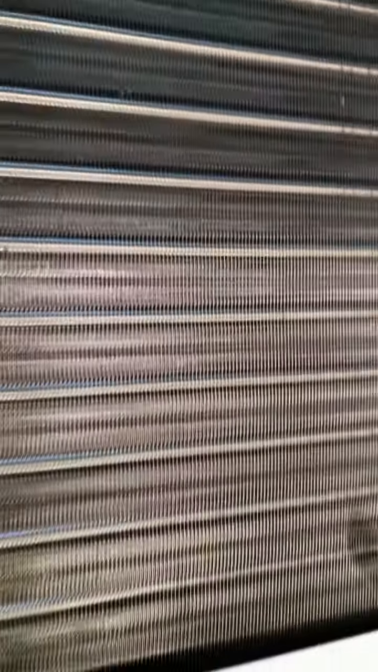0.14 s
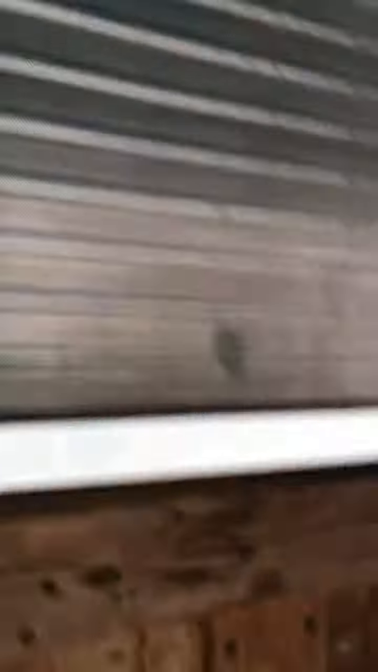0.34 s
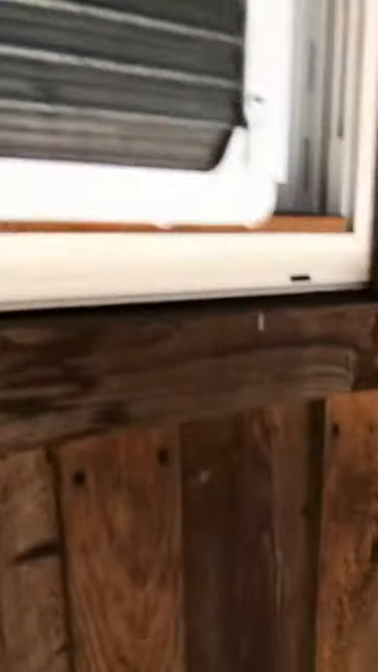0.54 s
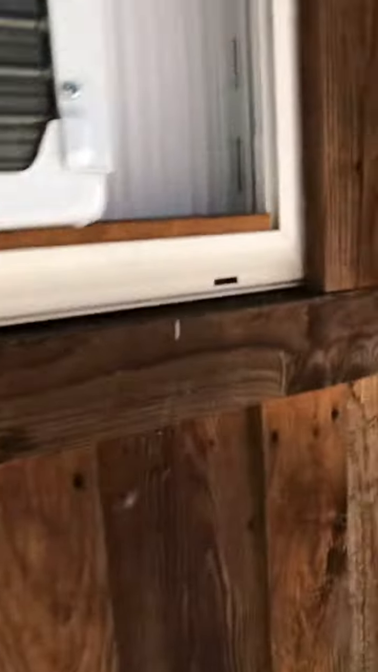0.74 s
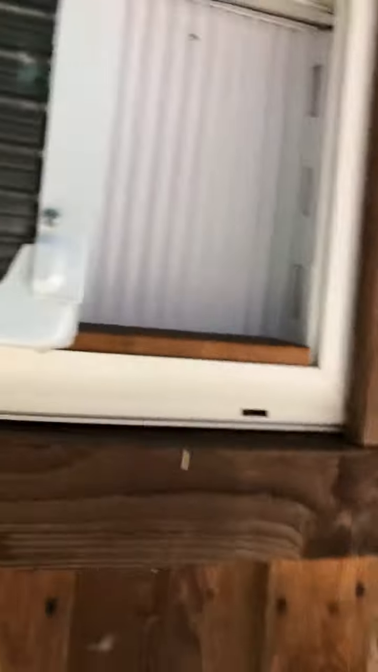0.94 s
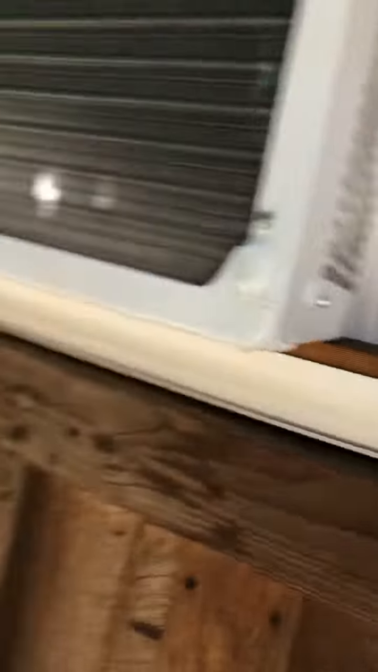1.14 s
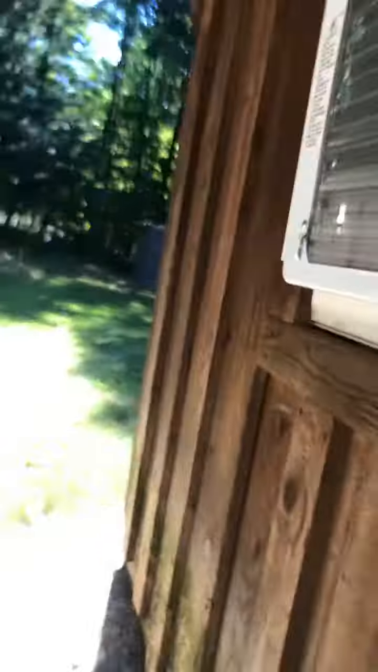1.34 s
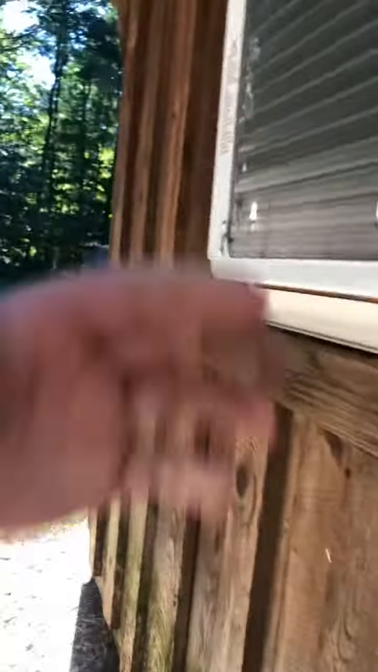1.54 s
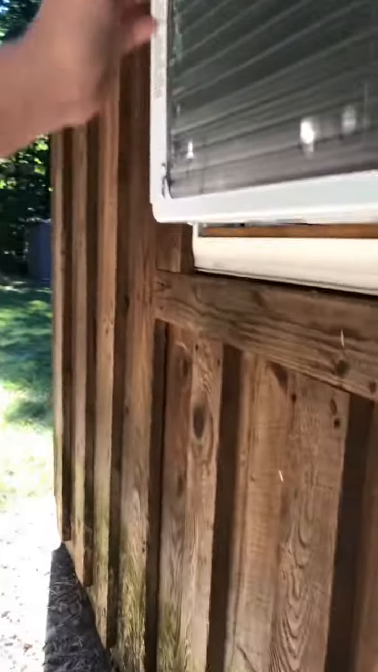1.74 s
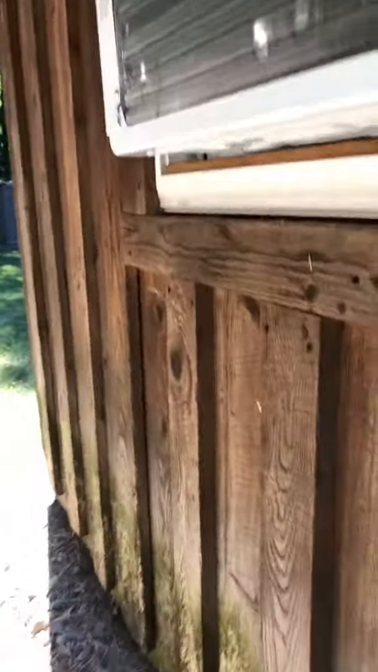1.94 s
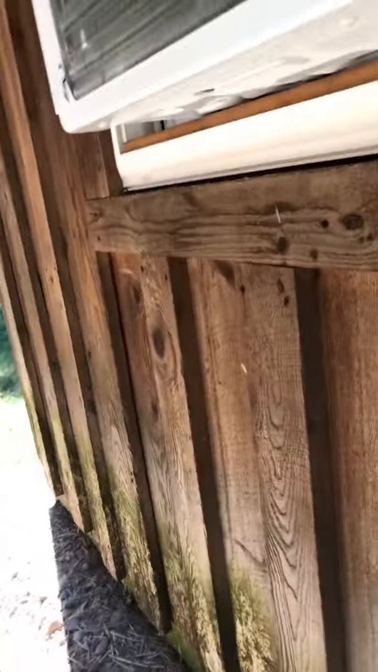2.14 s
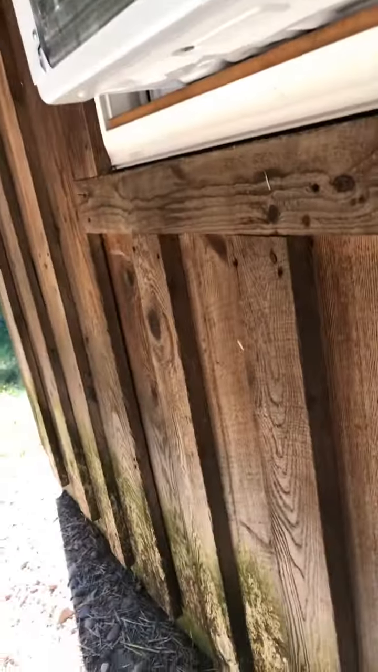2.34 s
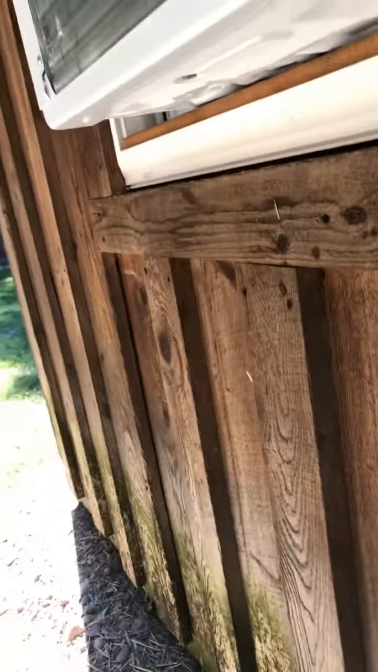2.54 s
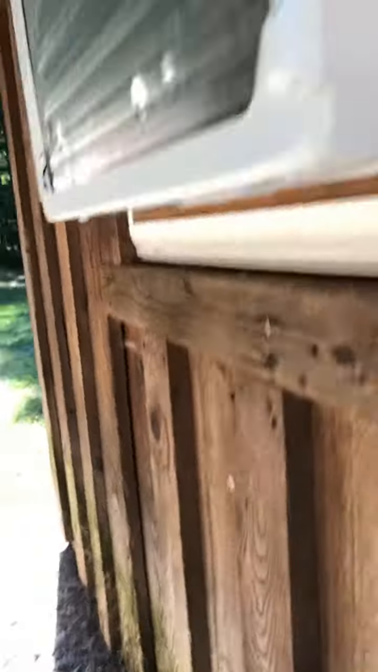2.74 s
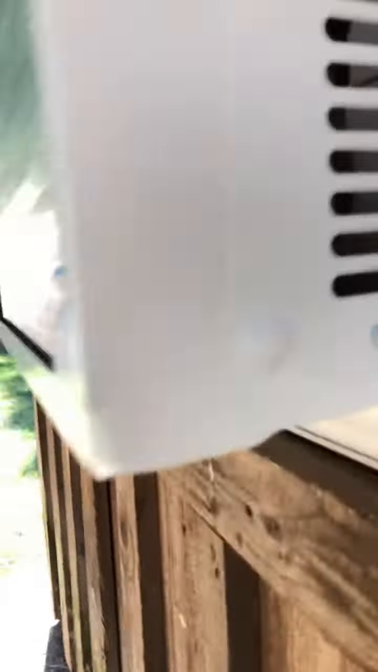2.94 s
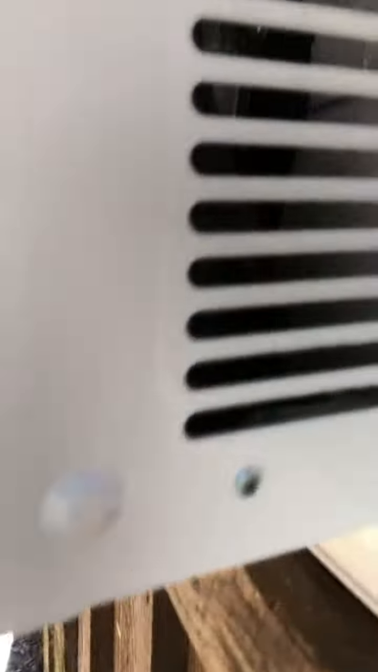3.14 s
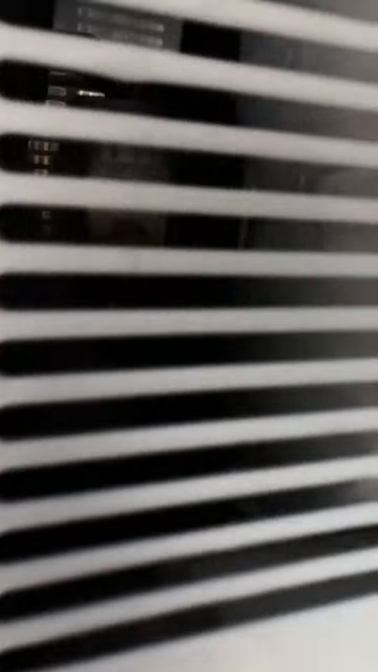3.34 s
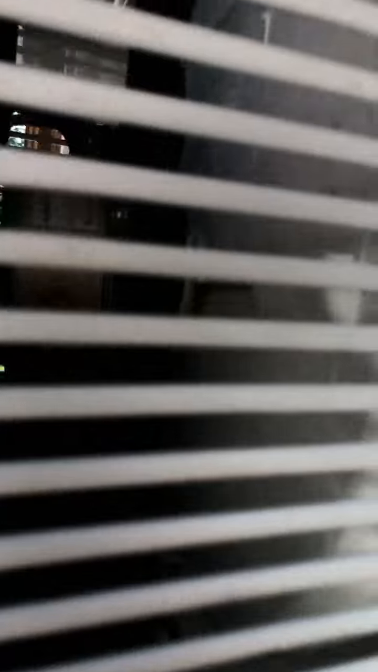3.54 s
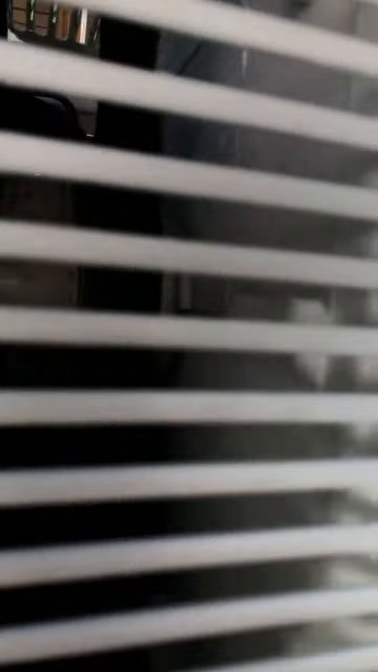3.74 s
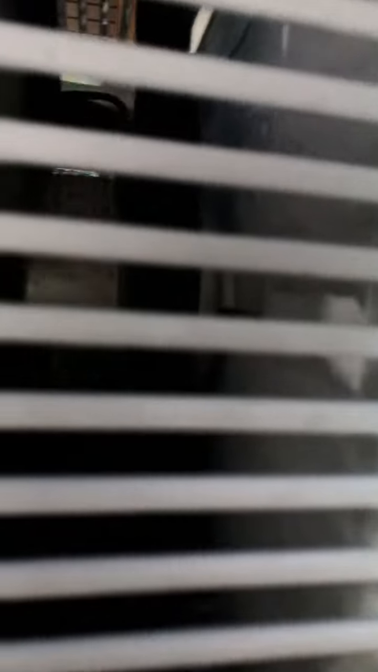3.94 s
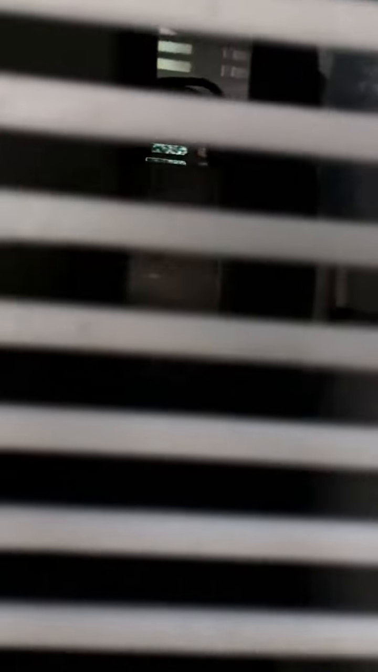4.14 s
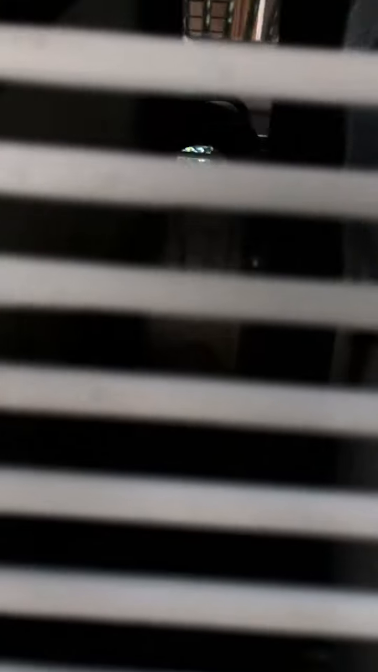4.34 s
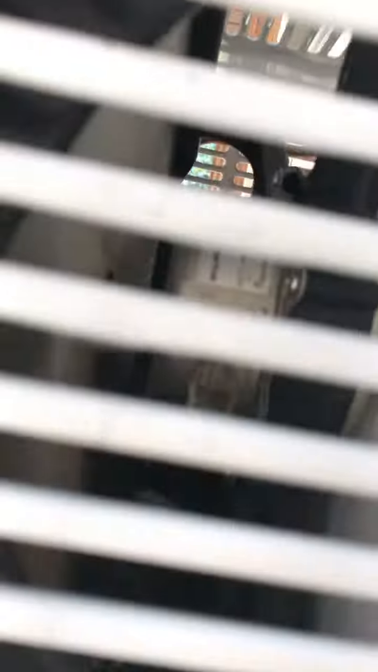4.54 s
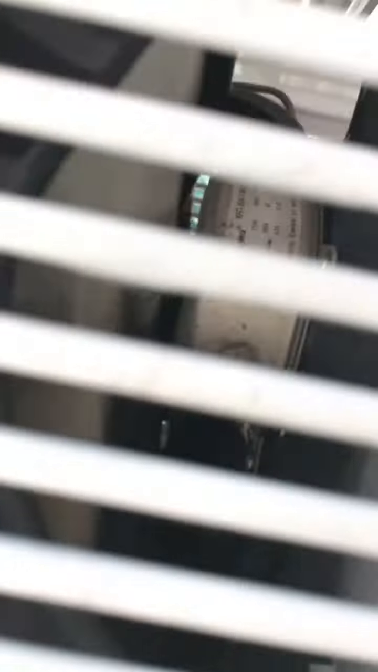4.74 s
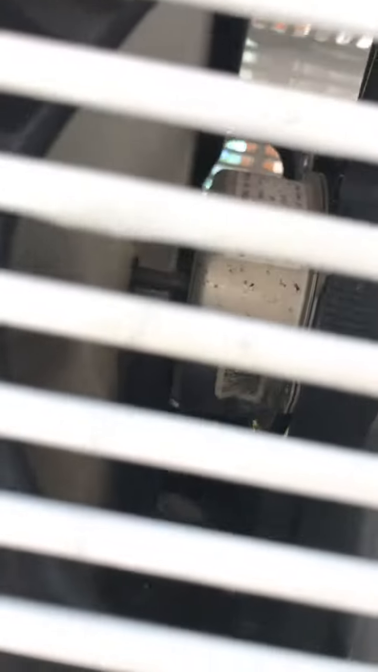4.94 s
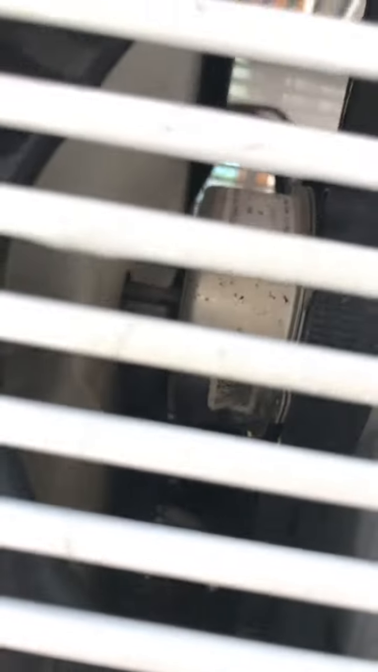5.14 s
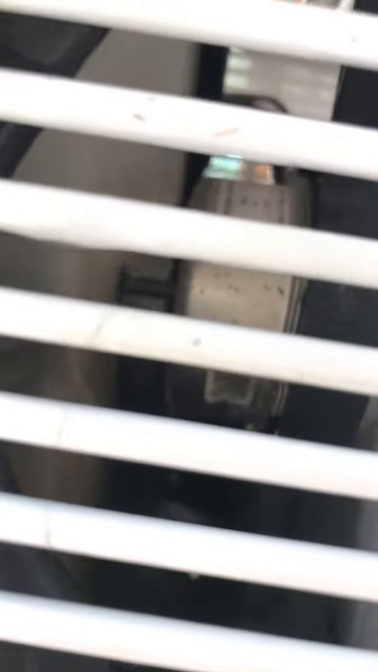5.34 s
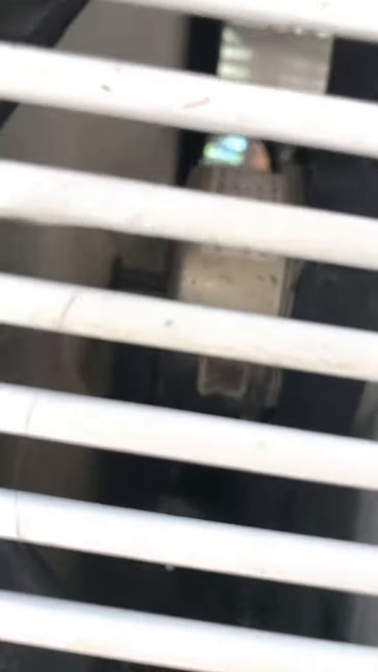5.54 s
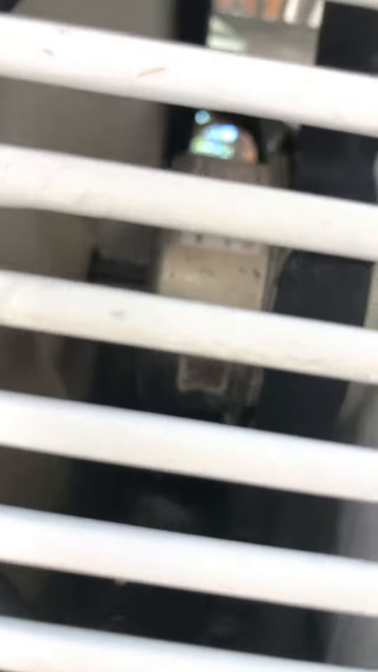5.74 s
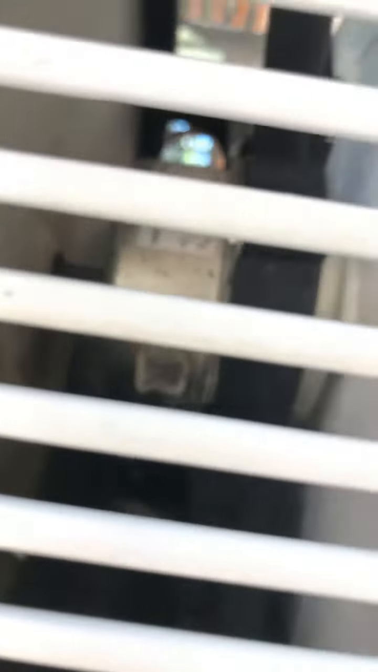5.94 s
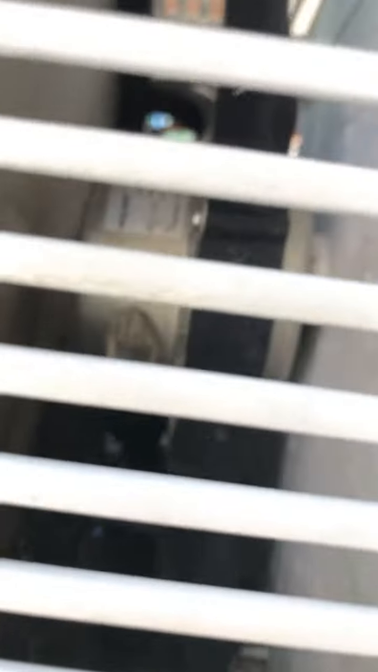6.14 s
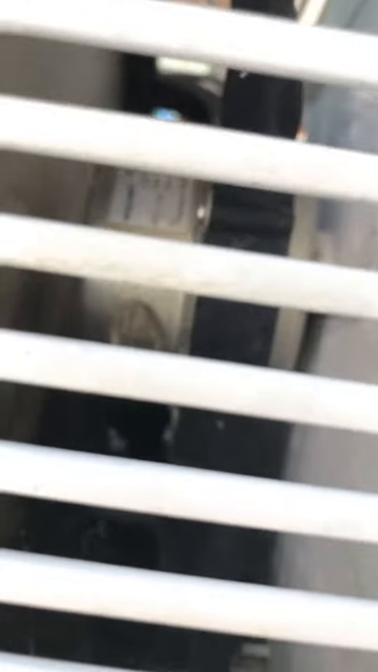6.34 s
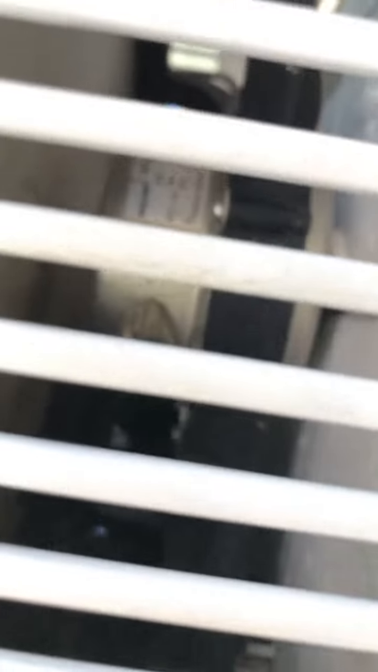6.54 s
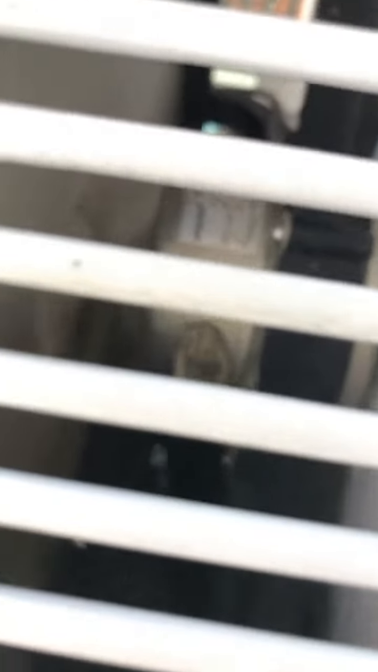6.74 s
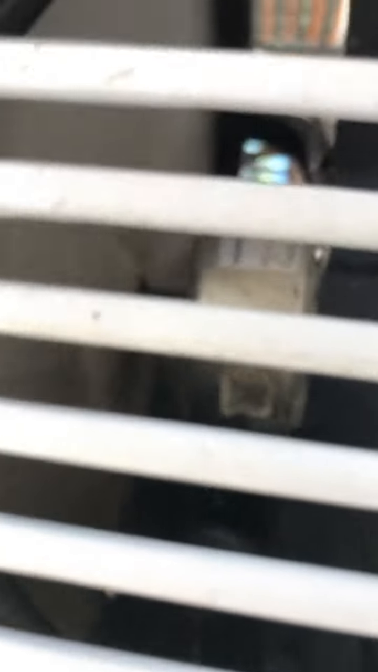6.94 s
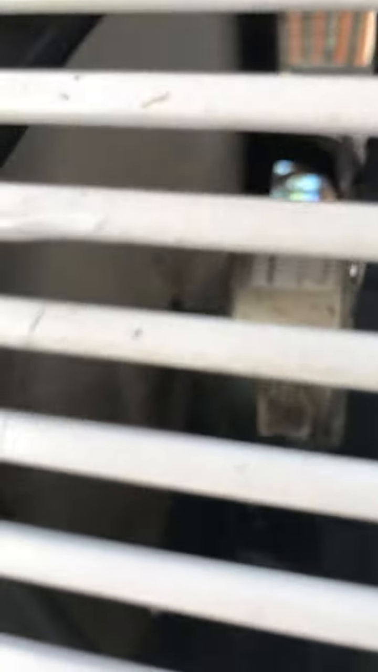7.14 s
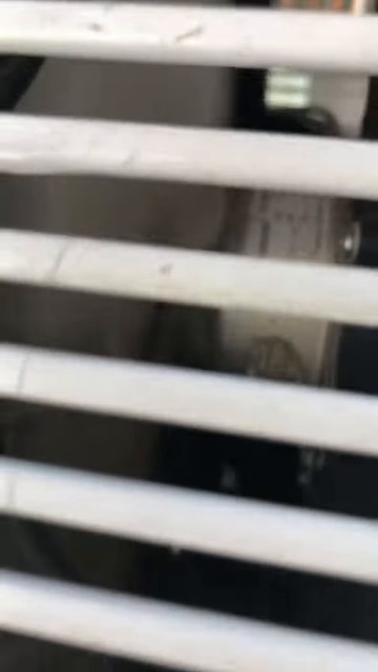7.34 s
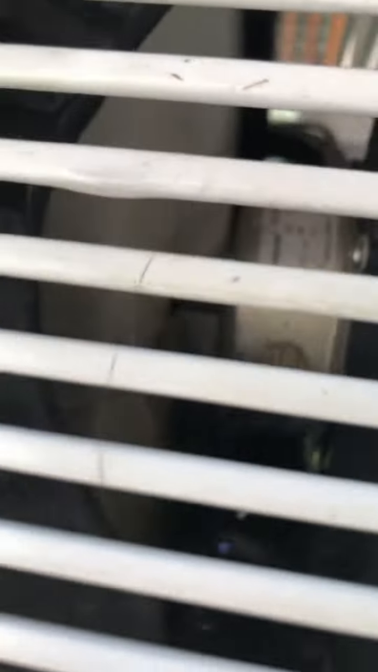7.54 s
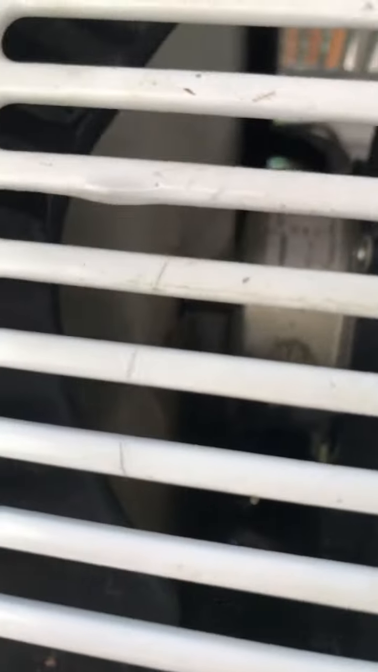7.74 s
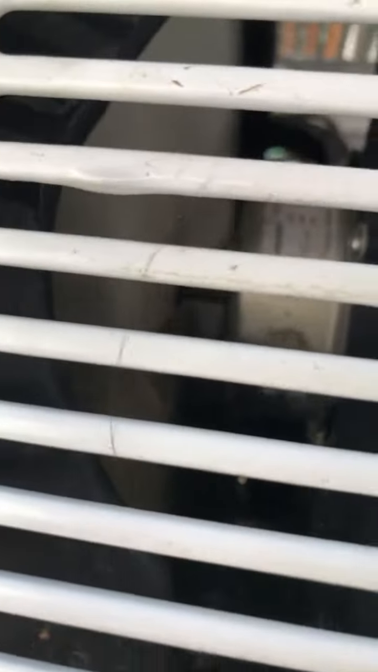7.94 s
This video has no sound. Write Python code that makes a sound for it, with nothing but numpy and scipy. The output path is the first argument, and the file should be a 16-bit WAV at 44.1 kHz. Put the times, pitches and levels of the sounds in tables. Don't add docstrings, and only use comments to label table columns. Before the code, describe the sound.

Outdoors, a phone microphone is carried close around a running window air conditioner. From 0 to 0.4 s the outflow buffets the microphone with quick, lumpy low thumps over fan noise, with one faint far bird chirp. From 0.4 to about 1.2 s the thumps stop and a soft airy band climbs in pitch as the phone slides past the case edge. Until 3 s the rush is quieter and hollow beside the wooden wall; distant chirps come between 1.6 and 2.3 s, and a sharp water slap with a tiny metallic knock lands at 2.2 s. Around 3.2 to 3.6 s the sound swells strongly: low steady blade drone near 112 Hz, motor buzz, full air roar. It stays loud and fluttering to 8 s, with faint compressor whine, fine spray, bright droplet ticks, and a clearer pan knock at 7.6 s.

```python
import sys
import numpy as np
from scipy import signal
from scipy.fft import rfft, irfft, next_fast_len
from scipy.io import wavfile
from scipy.ndimage import uniform_filter1d

SR = 44100
rng = np.random.default_rng(int(sys.argv[2]) if len(sys.argv) > 2 else 0)


def digitize_waveform(pressure):
    field = np.atleast_2d(pressure).T
    bounded = np.clip(field, -1, 1)
    quanta = np.round(bounded * 32767).astype(np.int16)
    wavfile.write(sys.argv[1], SR, quanta)


def attenuation_scalar(level_db):
    decades = np.asarray(level_db, float) / 20
    return 10 ** decades


N = 351477
t = np.arange(N) / SR
BLADE_HZ = 111.95

# (time [s], nearness to case [dB], view of coil fins [dB], draught on microphone [dB])
PHONE_PATH = [(0.0, -10.5, 4, -2), (0.4, -6.5, 3, -5), (0.6, -6, 4, -11), (0.9, -6, 5.5, -15),
              (1.2, -6, 1.5, -10), (1.35, -10, 2.5, -18), (1.8, -10, 1.5, -17), (2.2, -10.5, 3.5, -15.5),
              (2.7, -8.5, 3, -21), (3.0, -9, 2.5, -17), (3.4, -0.5, 2.5, -5), (3.7, 0.5, 4, 2.5),
              (4.2, 3, 1.5, 3.5), (4.7, 2.5, 0.5, 2), (5.4, 2, 0.5, 1.5), (6.8, 2.5, 1, 4.5),
              (7.3, 3.5, 0.5, 5.5), (7.97, 3.5, 0.5, -2.5)]
# (time [s], order 1 [dB], order 2 [dB], order 3 [dB])
BLADE_LEVELS = [(0.0, -41, -40, -40.5), (0.4, -50, -62, -46), (0.6, -44.5, -40.5, -48),
                (0.8, -38.5, -47, -44.5), (1.05, -45.5, -61, -41.5), (1.3, -55, -59, -47.5),
                (2.2, -72, -56, -48), (2.6, -55.5, -62, -62), (2.85, -42, -55, -46.5),
                (3.2, -33.2, -38, -37), (3.6, -27.5, -31, -31.5), (3.85, -28.5, -34, -31.5),
                (4.6, -24.5, -30.5, -30), (5.5, -28.5, -30.5, -31.5), (5.95, -28, -34.5, -31),
                (6.35, -30, -30.5, -32.5), (7.2, -28.5, -32, -31), (7.97, -32.5, -34, -32.5)]
# (time [s], level [dB])
MOTOR_HUM = [(0.0, -49.5), (1.0, -41.5), (1.6, -45.5), (2.8, -44), (3.2, -41), (3.6, -34.5), (4.0, -34),
             (4.4, -31), (4.8, -33), (5.2, -38), (6.0, -32.5), (6.4, -36.5), (6.8, -33), (7.2, -31.5),
             (7.97, -41)]
# (order [-], level [dB])
COMPRESSOR_ORDERS = [(19, -64), (28, -71), (29, -67), (30, -70), (35, -67), (127, -71), (128, -80),
                     (129, -67)]
# (frequency [Hz], density [dB per Hz])
RUSH_SPECTRUM = [(35, -12), (95, 0), (160, -2.5), (350, -4.5), (480, -19), (600, -13), (800, -12.5),
                 (980, -22), (1300, -22.5), (1800, -27), (2600, -30.5), (6600, -36.5), (7400, -37),
                 (8200, -42.5), (12000, -65.5)]
# (frequency [Hz], change [dB])
WALL_COMB = [(60, -1), (100, -0.5), (160, 4), (240, -3), (320, -4), (470, 1), (600, 4), (740, -10),
             (880, 3.5), (1050, -1), (1550, -4), (2000, 1.5), (4500, -2.5)]
PART_HZ = [80, 270, 680, 3200]
# (time [s], level [dB], centre [Hz])
PORT_BUFFET = [(0.0, -45, 362), (0.02, -31, 320), (0.05, -32.5, 289), (0.174, -35, 337),
               (0.194, -29.5, 332), (0.24, -37, 350), (0.312, -29.5, 445), (0.368, -47, 384),
               (0.38, -35, 338)]
# (time [s], peak [dB], pitch [Hz])
PORT_THUMPS = [
    (0.057, -24, 240),
    (.099, -22, 332),
    (.194, -24, 310),
    (0.219, -29, 400),
    (0.269, -26.5, 364),
    (.299, -36, 480),
    (.311, -33, 524),
    (.33, -28, 675),
]
# (time [s], peak [dB], length [s])
WATER_SCOOPS = [(0.042, -47.5, 0.21), (0.252, -46, 0.085), (0.433, -51, 0.085), (1.155, -51.5, 0.097),
                (1.503, -55, 0.054), (1.677, -55, 0.44), (2.087, -49.5, 0.11), (2.225, -48, 0.037),
                (2.375, -59, 0.24), (2.72, -52, 0.11), (3.11, -58, 0.18), (3.46, -60, 0.064),
                (3.598, -46, 0.054), (3.91, -50.5, 0.14), (4.054, -49, .07), (4.22, -53, 0.15),
                (4.553, -47, 0.17), (4.96, -50, 0.33), (5.133, -44, 0.029), (5.226, -48, 0.14),
                (5.53, -45, 0.11), (5.99, -51, 0.083), (6.21, -52.5, 0.25), (6.535, -44, 0.057),
                (6.75, -44.5, 0.1), (6.947, -47.5, .12), (7.14, -48, .1), (7.273, -50, 0.035),
                (7.546, -47, 0.03), (7.64, -48, 0.13)]
# (frequency [Hz], density [dB per Hz])
SPRAY_SPECTRUM = [(1500, -27), (3000, -2), (6000, -1), (9000, 0.5), (13000, 1.5), (16000, 2)]
# (time [s], peak [dB], centre [Hz])
WATER_SLAPS = [(0.6474, -40, 4350), (0.8026, -40, 5000), (1.144, -43, 4360), (1.915, -38, 4700),
               (2.07, -38, 7210), (2.2362, -25.5, 4500), (2.377, -42, 5090), (2.5855, -41, 6140),
               (3.1094, -38, 4440), (3.455, -36, 3810), (3.5728, -36, 3590), (3.7524, -40, 7500),
               (3.896, -36, 6390), (4.1425, -37, 5360), (4.275, -37, 7440), (4.584, -46, 4260),
               (4.863, -40, 3530), (4.9242, -46, 6590), (5.021, -42, 7640), (5.116, -37, 6000),
               (5.21, -32.5, 5390), (5.505, -37, 7600), (5.9828, -40, 7420), (6.0257, -38, 8340),
               (6.1843, -42, 7100), (6.7775, -40, 12400), (6.9401, -36, 6490), (7.2454, -40, 7620),
               (7.5901, -40, 7070), (7.633, -34, 6240)]
# (time [s], peak [dB], centre [Hz])
FIN_TICKS = [(0.3846, -35, 11600), (0.467, -34, 9040), (0.6276, -33, 8710), (0.9833, -35, 8410),
             (2.0698, -42, 11100), (2.2364, -29, 14100), (2.3427, -32, 9540), (2.3781, -37, 12700),
             (2.9897, -34, 8180), (3.8972, -36, 12400), (4.2743, -32, 14700), (4.3082, -31, 12500),
             (4.584, -26, 8620), (4.8635, -30, 13600), (4.9243, -31, 13200), (5.0206, -36, 8910),
             (5.2042, -30, 14600), (5.505, -37, 8440), (6.0258, -37, 8340), (6.0637, -36, 13000),
             (6.6299, -32, 14800), (6.7776, -32, 12400), (6.8928, -35, 9380), (7.1298, -28, 14200),
             (7.192, -28, 14500), (7.2455, -33, 13700), (7.3887, -31, 14400), (7.5908, -36, 8330),
             (7.6322, -33, 10100), (7.7888, -30, 13500)]
# (time [s], peak [dB])
PAN_KNOCKS = [
    (2.237, -46),
    (2.241, -37),
    (5.117, -45),
    (7.6325, -28.5),
]
# (frequency [Hz], level [dB], t60 [s])
PAN_MODES = [(1400, 6, 0.044), (2160, -6, 0.044), (2380, -1, 0.14), (2650, 2, .05), (3290, -2, 0.065),
             (3870, -5, .04), (4720, -10, .04)]
# (time [s], level [dB], pitch [Hz])
BIRD_CHIRPS = [
    (.045, -44, 3220),
    (1.645, -43, 3150),
    (1.705, -48, 3160),
    (1.77, -54, 3050),
    (1.86, -49, 3100),
    (1.915, -45, 3060),
    (2.08, -39, 3150),
    (2.295, -53, 2950),
]


def evened(x):
    return x / np.sqrt(np.mean(x ** 2) + 1e-20)


def read(points, hz):
    f, value = np.transpose(points)
    return np.interp(np.log(hz + 1), np.log(f + 1), value)


def curves(rows, at):
    s, *columns = np.transpose(rows)
    return np.array([np.interp(at, s, c) for c in columns])


def drift(seconds, count=1):
    size = max(round(seconds * SR), 2)
    slow = uniform_filter1d(uniform_filter1d(rng.standard_normal((count, N)), size), size)
    return slow / slow.std(1, keepdims=True)


def add(mix, s, sound):
    part = mix[round(s * SR):][:len(sound)]
    part += sound[:len(part)]


def coloured(x, points):
    size = next_fast_len(N)
    gain = attenuation_scalar(read(points, np.fft.rfftfreq(size, 1 / SR)))
    return irfft(rfft(x, size) * gain, size)[:N]


def resonate(x, hz, width_hz):
    turn = np.exp(2j * np.pi * np.cumsum(hz * np.ones(len(x))) / SR)
    r = np.exp(-np.pi * width_hz / SR)
    return 2 * (turn * signal.lfilter([1 - r], [1, -r], x / turn)).real


def resonate_twice(x, hz, first_width_hz, second_width_hz):
    return resonate(resonate(x, hz, first_width_hz), hz, second_width_hz)


def away(at):
    return np.clip(-curves(PHONE_PATH, at)[0] / 13.8, 0, 1)


def blades(flutter, flutter_db=0.6):
    one, two, three = curves(BLADE_LEVELS, t)
    coil_left_s, null_s, null_width_s = 0.63, 3.3, 0.2
    four = three - 16.5 + 13.5 * np.clip(2 * (1 - t / coil_left_s), 0, 1)
    five = 0.35 * three - 37 + 1.5 * drift(0.18)[0]
    five += -31 * np.exp(-((t - null_s) / null_width_s) ** 2)
    out = np.zeros(N)
    for k, level_db in enumerate([one, two, three, four, five, five - 5.5]):
        cycles = (k + 1) * BLADE_HZ * t + 0.033 * k ** 2 - 0.12
        out += attenuation_scalar(level_db + flutter_db * flutter[k]) * np.cos(2 * np.pi * cycles)
    return out


def motor(flutter):
    hum_hz = 240.0
    return attenuation_scalar(curves(MOTOR_HUM, t)[0] + 0.9 * flutter) * np.cos(2 * np.pi * hum_hz * t)


def compressor(shaft_hz=58.0, fade_db=3.3):
    turns = shaft_hz * t + 0.0029 * drift(0.084)[0]
    fading = drift(0.4, count=len(COMPRESSOR_ORDERS))
    far_db = -4.0 * away(t)
    out = np.zeros(N)
    for (order, db), fade in zip(COMPRESSOR_ORDERS, fading):
        out += attenuation_scalar(db + fade_db * fade + far_db) * np.cos(2 * np.pi * order * turns)
    return out


def tones():
    flutter = drift(0.037, count=7)
    return np.sqrt(2) * (blades(flutter) + motor(flutter[6]) + compressor())


def parts(at):
    near_db, view_db, draught_db = curves(PHONE_PATH, at)
    gusts = np.interp(at, t, drift(0.094)[0])
    roar_db = 0.53 * near_db + 0.46 * view_db + 1
    return np.array([draught_db + 1.5 * gusts, near_db, roar_db, view_db])


def rush(level_db=-29.5, patchy_db=1.21, swell_db=1.5):
    frames, hz = N // 512 + 5, np.fft.rfftfreq(2048, 1 / SR)
    at = np.arange(frames) * 512 / SR
    a, b, patches, swells = rng.standard_normal((frames, 1025, 4)).T
    swells = evened(uniform_filter1d(uniform_filter1d(swells, 45, 0), 30, 1))
    swells *= np.clip(hz / 5000, 0, 1)[:, None]
    patches = evened(uniform_filter1d(uniform_filter1d(patches, 14, 0), 6, 1))
    blend = np.array([np.interp(np.log(hz + 1), np.log(PART_HZ), row) for row in np.eye(4)])
    shape_db = read(RUSH_SPECTRUM, hz) - 12.0 * (hz < 20)
    gain_db = shape_db[:, None] + blend.T @ parts(at) + patchy_db * patches + swell_db * swells
    gain_db += np.outer(read(WALL_COMB, hz), away(at))
    x = signal.istft((a + 1j * b) * attenuation_scalar(gain_db), nperseg=2048, noverlap=1536)[1][:N]
    low = signal.lfilter([0.12], [1, -0.88], x)
    x += 0.12 * low * np.cos(2 * np.pi * BLADE_HZ * t)
    return attenuation_scalar(level_db) * x / x[N // 2:].std()


def buffet():
    size = round(PORT_BUFFET[-1][0] * SR)
    level_db, hz = curves(PORT_BUFFET, t[:size])
    lumps = attenuation_scalar(3.1 * drift(0.0046)[0, :size]) * rng.standard_normal(size)
    ring = resonate_twice(lumps, hz, 170, 230)
    ring += 0.51 * resonate_twice(lumps, 450.0, 120, 120)
    out = np.zeros(N)
    out[:size] = attenuation_scalar(level_db - 4.0) * evened(ring) * signal.windows.tukey(size, 0.15)
    u = t[:800] - t[400]
    pulse = np.exp(-(u / 0.0023) ** 2)
    for s, db, pitch_hz in PORT_THUMPS:
        add(out, s - t[400], attenuation_scalar(db) * pulse * np.sin(2 * np.pi * pitch_hz * u))
    return out


def sweep(start_s=0.4, length_s=0.86, level_db=-46, from_hz=540, to_hz=1020):
    out, u = np.zeros(N), np.arange(0, 1, 1 / (length_s * SR))
    hz = from_hz + (to_hz - from_hz) * u
    band = resonate_twice(rng.standard_normal(N)[:len(u)], hz, 270, 270)
    add(out, start_s, attenuation_scalar(level_db) * np.sqrt(np.sin(np.pi * u)) * evened(band))
    return out


def wetness(drizzle_db=-54.5, drizzle_share=0.44, rise_share=0.41):
    s, db, length = np.transpose(WATER_SCOOPS)[:, :, None]
    at = t[::64]
    u = (at - s) / length
    scoops = attenuation_scalar(db) * np.exp(-np.where(u < 0, -u / rise_share, u))
    drizzle = attenuation_scalar(drizzle_db + drizzle_share * curves(PHONE_PATH, at)[0])
    return np.interp(t, at, np.sqrt(drizzle ** 2 + (scoops ** 2).sum(0)))


def droplets(per_s=500):
    kind, out = rng.integers(0, 24, N), np.zeros(N)
    kicks = attenuation_scalar(1.8 * np.minimum(rng.exponential(1, N), 3)) * (rng.random(N) < per_s / SR)
    for k, hz in enumerate(np.geomspace(3800, 14500, num=24)):
        cycles = np.arange(0, 60, hz / SR)
        ring = np.sin(2 * np.pi * cycles * (1 + 0.001 * cycles))
        ring *= np.exp(-cycles / 9) * (1 - np.exp(-cycles))
        out += signal.oaconvolve(kicks * (kind == k), ring / np.linalg.norm(ring))[:N]
    return out


def spray(per_s=9000, spread_db=1.0, clump_db=2.06, drops_db=-8.0):
    clumps, high_clumps = evened(attenuation_scalar(clump_db * drift(0.013, count=2)))
    sizes = attenuation_scalar(spread_db * np.minimum(rng.exponential(1, N), 6)) * rng.standard_normal(N)
    mist = coloured(sizes * (rng.random(N) < per_s / SR), SPRAY_SPECTRUM)
    water = evened(mist) + attenuation_scalar(drops_db) * evened(droplets())
    sheen = coloured(water, [(8000, -38), (15000, 1)])
    high_pass = signal.butter(2, 8000.0, "high", fs=SR, output="sos")
    top = signal.sosfilt(high_pass, water)
    low_part = clumps * (water - 1.12 * top)
    high_part = high_clumps * (0.54 * top + (0.3 - 0.61 * away(t)) * sheen)
    return attenuation_scalar(4.0) * wetness() * (low_part + high_part)


def slaps(t60_s=0.045, rise_s=0.0007, smack_db=-13.0):
    out, u = np.zeros(N), t[:4000]
    for (s, db, hz), noise in zip(WATER_SLAPS, rng.standard_normal((len(WATER_SLAPS), 4000))):
        wide = signal.lfilter([1, -1], [1, -0.6], noise)
        smack = attenuation_scalar(smack_db) * evened(resonate(noise, 3900.0, width_hz=1100))
        body = evened(wide) + 1.36 * evened(resonate(noise, hz, width_hz=1800)) + smack
        add(out, s, attenuation_scalar(db - 6.5 - 60 * u / t60_s) * (1 - np.exp(-u / rise_s)) * body)
    return out


def ticks(t60_s=0.014, rise_s=0.00095, level_db=-2.5):
    out, u = np.zeros(N), t[:1000]
    for (s, db, hz), noise in zip(FIN_TICKS, rng.standard_normal((len(FIN_TICKS), 1000))):
        spit = evened(resonate(noise, hz, width_hz=4100))
        add(out, s, attenuation_scalar(db + level_db - 60 * u / t60_s) * (1 - np.exp(-u / rise_s)) * spit)
    return out


def knocks(damping=2.2):
    out, u = np.zeros(N), t[:3000]
    shares = rng.uniform(0.42, 1, (len(PAN_KNOCKS), len(PAN_MODES)))
    for (s, db), share in zip(PAN_KNOCKS, shares):
        ring = np.zeros(len(u))
        for a, (hz, mode_db, t60_s) in zip(share, PAN_MODES):
            ring += a * attenuation_scalar(mode_db - damping * 60 * u / t60_s) * np.sin(2 * np.pi * hz * u)
        add(out, s, attenuation_scalar(db - 3.0) * ring)
    return out


def bird():
    out = np.zeros(N)
    for (s, db, hz), air in zip(BIRD_CHIRPS, rng.standard_normal((len(BIRD_CHIRPS), 1300))):
        whistle = evened(resonate_twice(air, hz, 150.0, 150.0))
        add(out, s - 0.015, attenuation_scalar(db - 5.5) * np.hanning(1300) * whistle)
    echo = rng.standard_normal(9000) * attenuation_scalar(-60 * t[:9000] / 0.3)
    return out + 1.04 * signal.oaconvolve(out, echo / np.linalg.norm(echo))[:N]


def scene():
    machine = tones() + rush() + buffet() + sweep()
    water = spray() + slaps() + ticks() + knocks()
    return (machine + water + bird())[None]


def low_pass(x):
    return signal.sosfilt(signal.butter(12, 16640, fs=SR, output="sos"), x)


def record(dry):
    bass_cut = signal.butter(4, 40.0, "high", fs=SR, output="sos")
    firm = signal.sosfilt(bass_cut, dry)
    edge = signal.firwin(numtaps=1023, cutoff=15800, window=("kaiser", 10), fs=SR)
    mix = signal.oaconvolve(firm, edge[None], "same")
    return low_pass(mix)


dry = scene()
out = record(dry)
digitize_waveform(out)
```